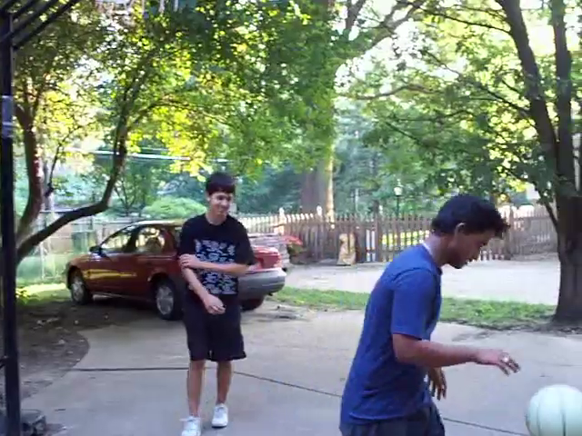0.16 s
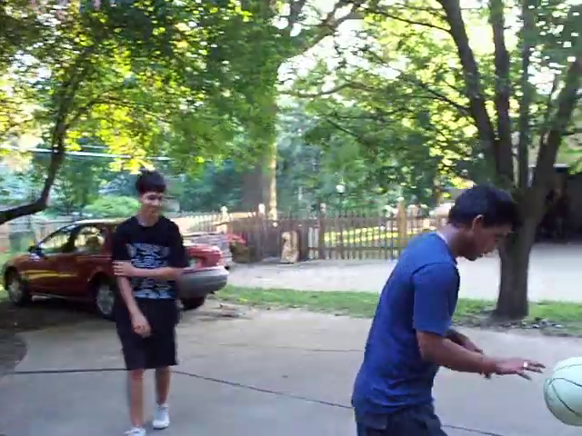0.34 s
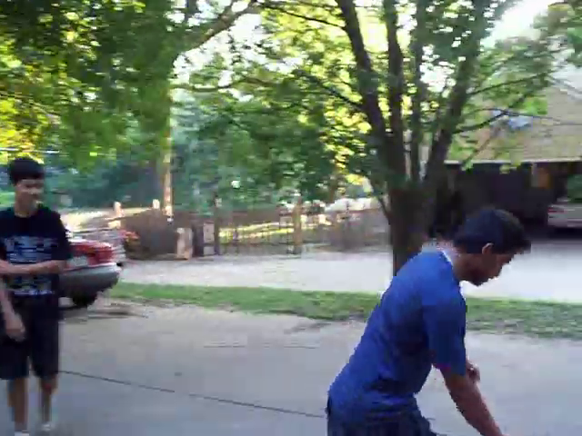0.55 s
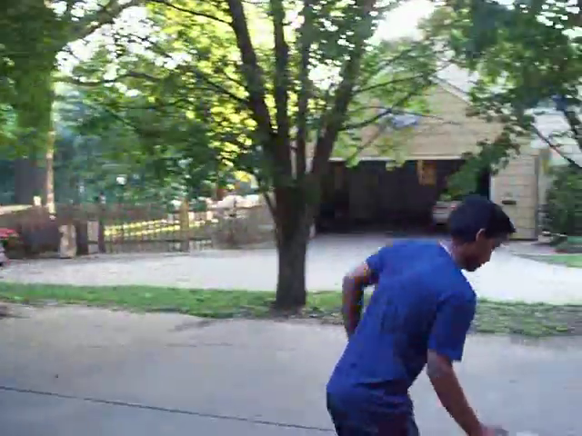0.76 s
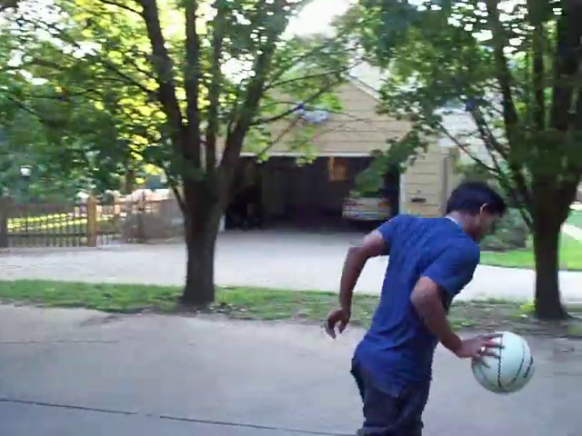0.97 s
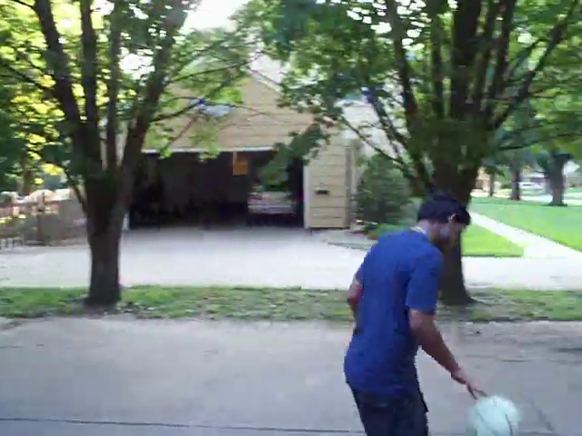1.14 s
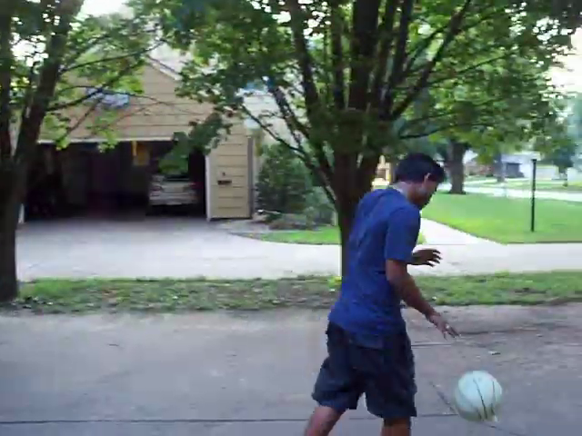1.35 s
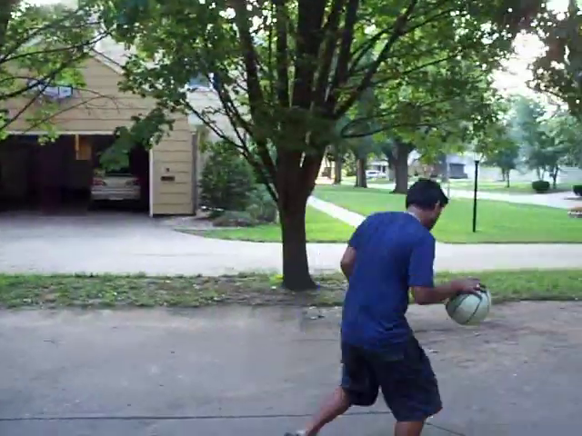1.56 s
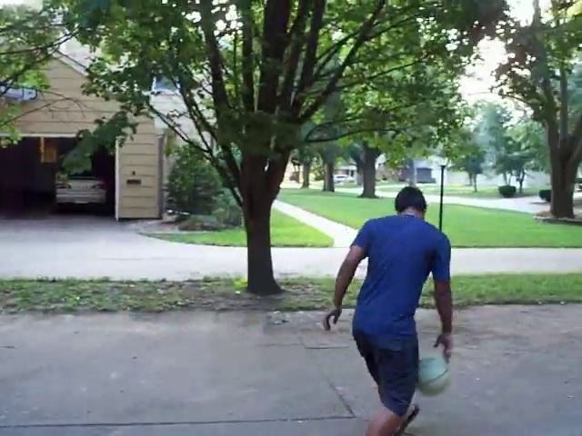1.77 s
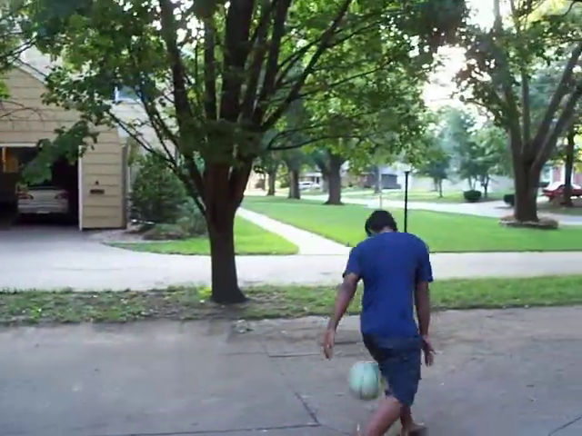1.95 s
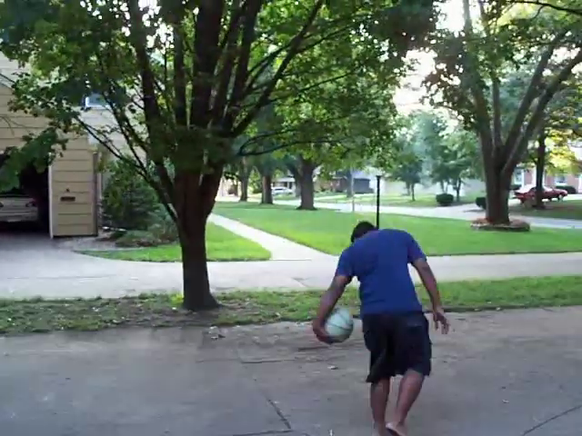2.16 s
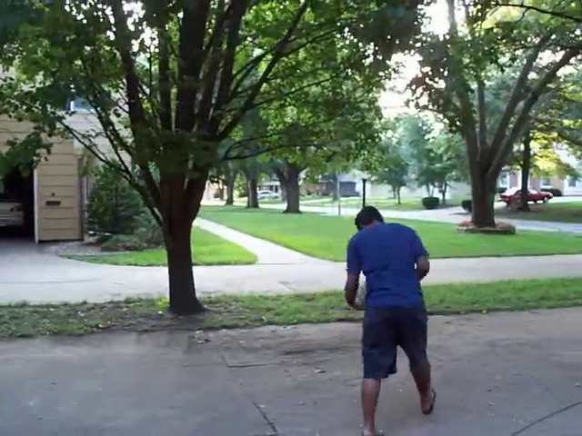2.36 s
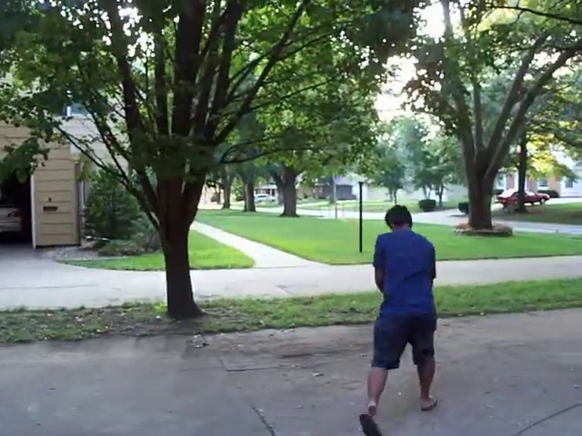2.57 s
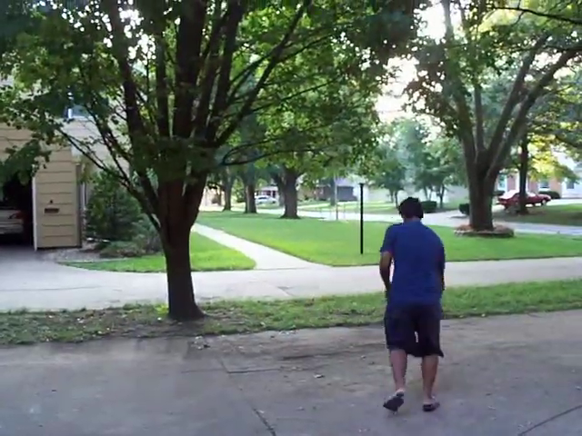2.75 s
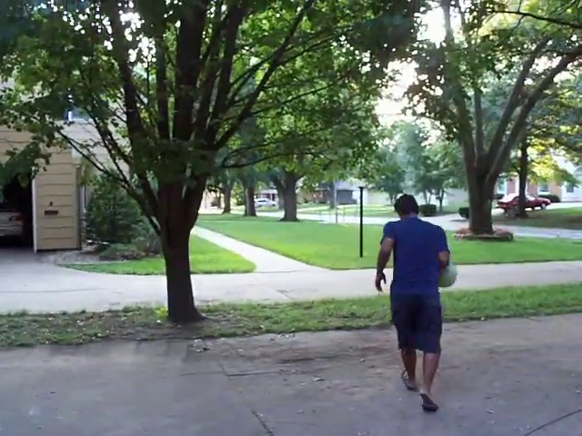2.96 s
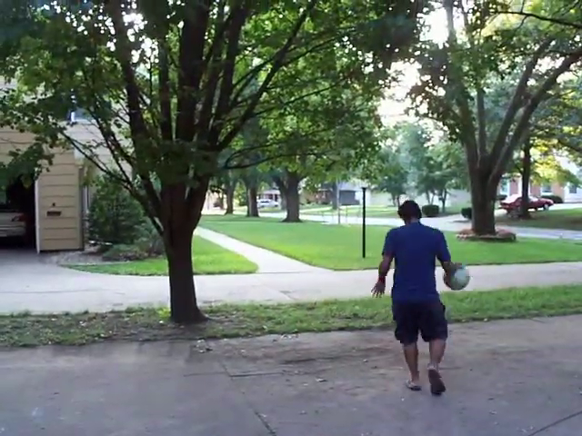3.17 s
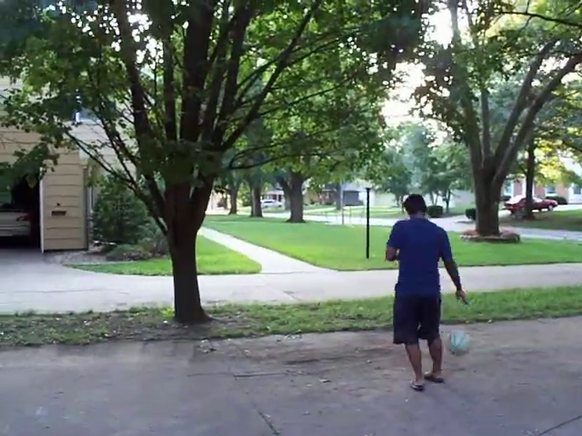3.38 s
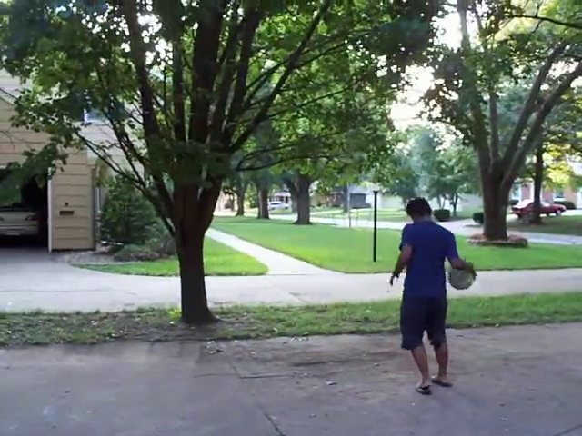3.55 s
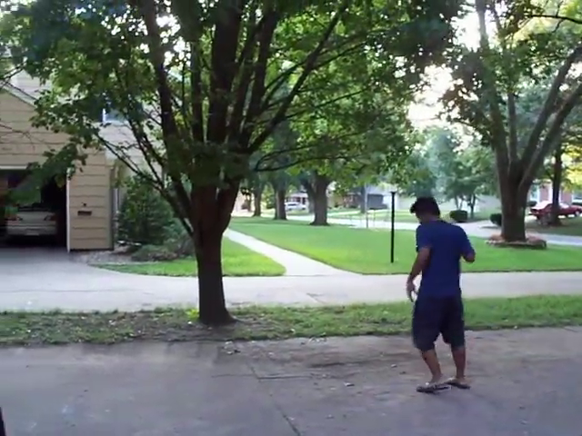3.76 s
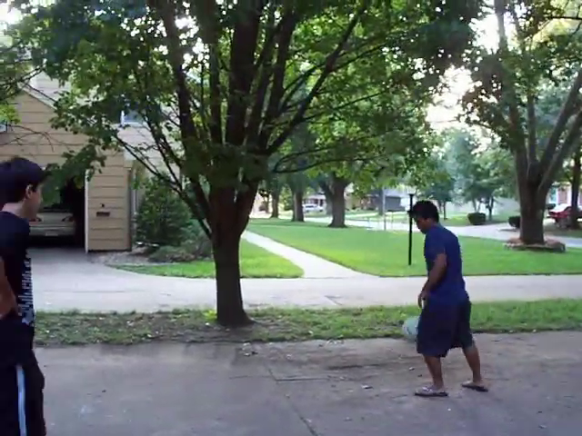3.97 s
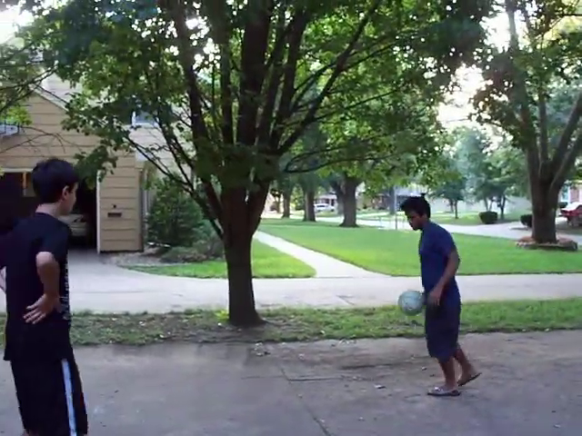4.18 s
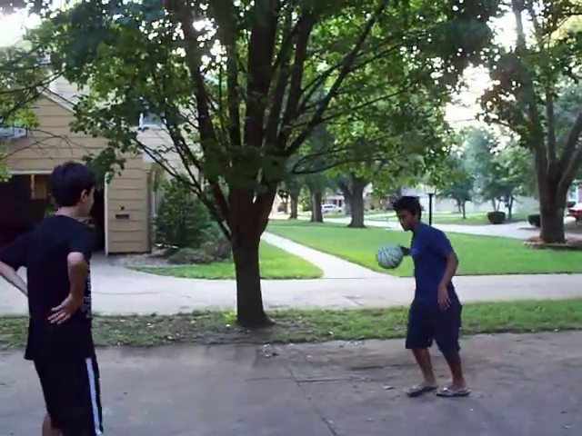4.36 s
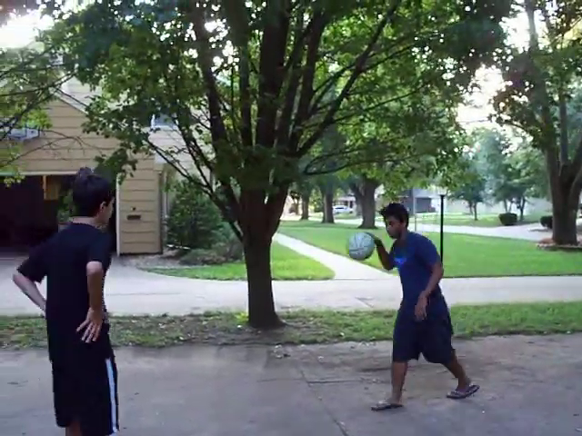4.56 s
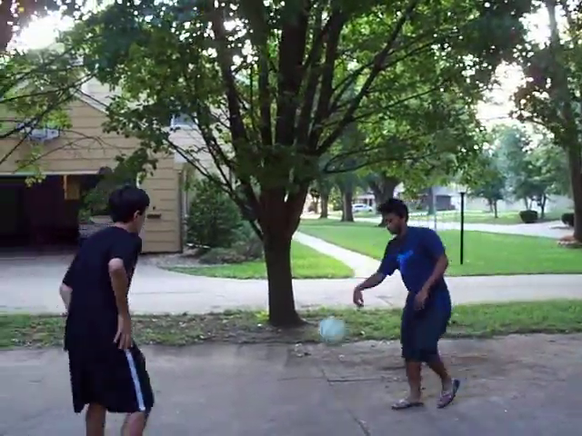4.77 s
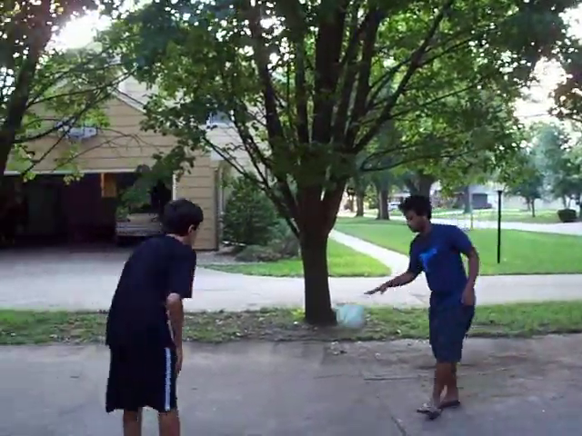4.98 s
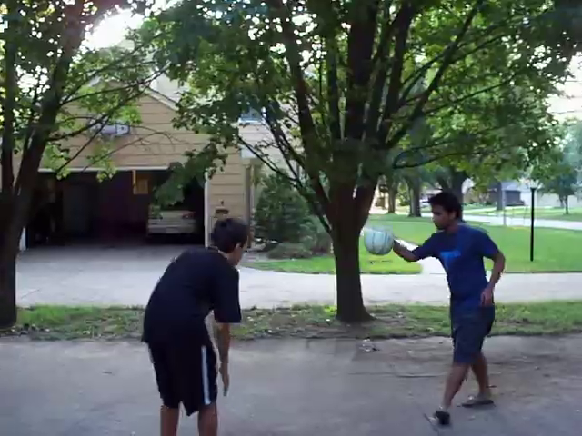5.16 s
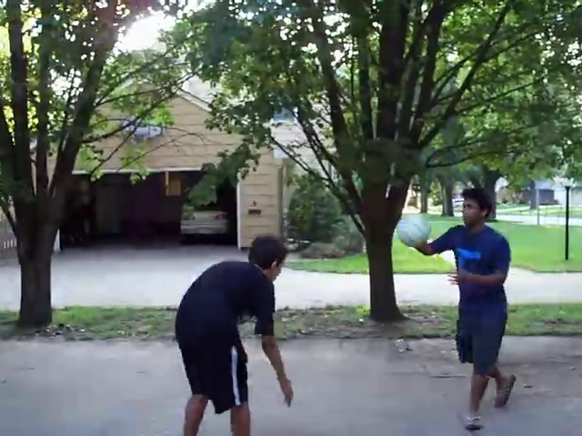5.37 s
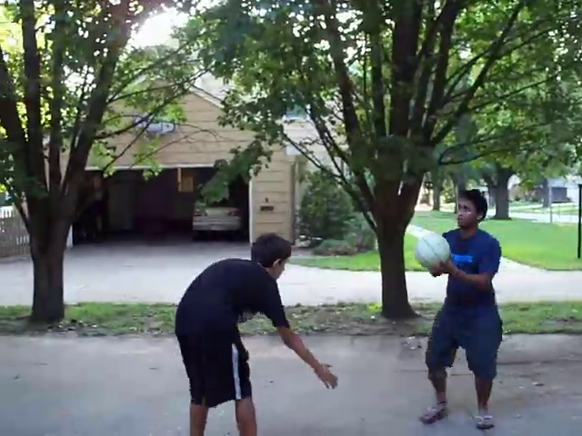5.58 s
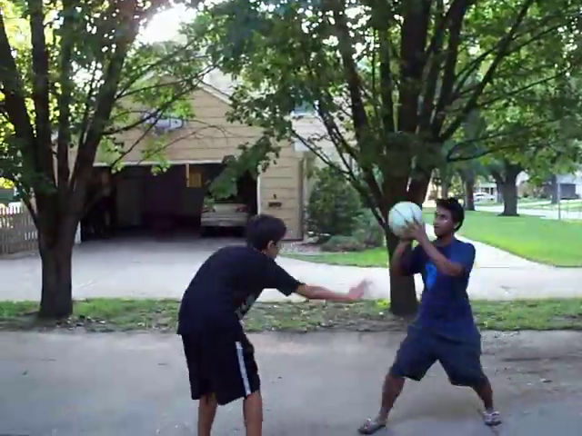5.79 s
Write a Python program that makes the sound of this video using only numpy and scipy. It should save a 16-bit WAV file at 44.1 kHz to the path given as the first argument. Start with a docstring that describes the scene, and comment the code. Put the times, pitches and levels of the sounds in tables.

```python
"""A basketball is dribbled on a concrete driveway; distant traffic, hiss and an echo are there at once.
A faint far whistle passes, then from 0.6 s come seven bounces: each a low thump, a rubber slap and a
faint ring of the air inside, thrown back by house fronts and trees. In between, hands pat the ball and
sandals flap and scuff on grit, a little more echoing from 1 to 3 s as the player walks off.
Thin whistles return after 4 s; the last bounce lands at 4.9 s, and a few steps close the scene."""
import sys
import numpy as np
from scipy import signal
from scipy.fft import rfft, irfft, next_fast_len
from scipy.io import wavfile

SR = 44100
rng = np.random.default_rng(int(sys.argv[2]) if len(sys.argv) > 2 else 0)


def log_audio(samples):
    """Write samples as a 16-bit WAV file to the path given in sys.argv[1]."""
    # one column per channel
    frames = np.atleast_2d(samples).T
    # limit to full scale, then quantise
    limited = np.clip(frames, -1, 1)
    pcm = np.round(limited * 32767).astype(np.int16)
    wavfile.write(sys.argv[1], SR, pcm)


N = 256662
T = np.arange(N) / SR


# the ball hitting concrete: t/s, slap level/dB, thump level/dB, thump f/Hz, slap treble/dB
BOUNCE_HITS = [(0.62, -3, -10.5, 141.5, -3.5), (1.233, -2.5, -12.5, 147, -1),
               (1.856, -7.5, -12.5, 155, 5.5), (2.6904, -9.5, -10.5, 158, -2.5),
               (3.3369, -6.5, -13, 136.5, 5.5), (4.0442, -8.5, -12.5, 140, 2),
               (4.8628, -4, -10.5, 135.6, -1.5)]

def dribble(tail_skip_s=0.07, tail_db=-3):
    """The run of bounces, opening on the echo tail of one that fell just before."""
    out = np.zeros(N)
    for s, *hit in BOUNCE_HITS:
        for layer in bounce(*hit):
            add(out, s, layer)
    _, tail = bounce(*BOUNCE_HITS[0][1:])
    add(out, 0, undb(tail_db) * tail[int(tail_skip_s * SR):])
    return out


def bounce(slap_db, thump_db, hz, treble_db, thump_send_db=2, ring_send_db=-8):
    """One hit in three layers, as (direct, echo); the player moves, so each gets its own echo."""
    direct, reverb = np.zeros(N), yard()
    squash_s = 0.0046 * undb(slap_db) ** 0.44  # a harder hit flattens the ball for longer
    body = undb(thump_db + 5) * thump(hz, squash_s)
    ring = undb(slap_db - 15) * ball_ring()
    attack = undb(slap_db) * rubber_eq(slap(), treble_db)
    for layer in body, ring, attack:
        add(direct, 0, layer)
    # the yard gathers the slap from all directions, which evens out its tone and strength
    echo = undb(18 + 0.49 * slap_db) * rubber_eq(reverb, treble_db / 2)
    for layer, send_db in (body, thump_send_db), (ring, ring_send_db):
        echo += undb(send_db) * signal.fftconvolve(layer, reverb)[:len(reverb)]
    return direct, echo


def thump(hz, squash_s, overtone=1.695, overtone_db=-15):
    """The low body: the ball flattens and springs back in a few swings, with a weaker, higher flex."""
    t = T[:SR // 10]
    swing = np.sin(2 * np.pi * hz * t) - undb(overtone_db) * np.sin(2 * np.pi * overtone * hz * t)
    envelope = (t / squash_s * np.exp(1 - t / squash_s)) ** 1.5
    return envelope * swing


def slap(spike_db=14, crack_db=-4, liftoff_s=0.0073, pop_db=-8):
    """The attack: a spike on contact, a crack as the skin flattens, a duller pop on lift-off."""
    t = T[:SR // 10]
    crack = undb(crack_db) * rng.standard_normal(len(t)) * fade(t, t60=0.026)
    crack[0] += undb(spike_db)
    pop = resonate(rng.standard_normal(len(t)), 900, 1100)
    return crack + undb(pop_db) * pop * fade(np.abs(t - liftoff_s), t60=0.037)


# EQ curve of rubber slapping concrete: f/Hz, level/dB
RUBBER_CURVE = [(100, -5.5), (350, 2.5), (600, 2), (1200, 0.5), (2400, -2), (3900, 0), (5200, -4),
                (7000, -14.5)]

def rubber_eq(x, treble_db):
    """The tone of rubber on concrete; a harder spot is brighter."""
    presence = (undb(treble_db) - 1) * resonate(x, 4450, 6400)
    return colour(x + presence, RUBBER_CURVE)


# modes of the ball's shell and the air inside: f/Hz, level/dB, t60/s
BALL_MODES = [(612, -12, 0.095), (960, -34.5, 0.11), (1098, -1.5, 0.051), (1250, -29, 0.063),
              (1511, -2, 0.031), (1706, -3, 0.022), (1896, -19, 0.19), (3059, -29, .16),
              (3926, -25.5, 0.09), (4650, -40, 0.044)]

def ball_ring(spread_db=2):
    """The ball lands on a new spot each time, so its modes share the blow differently."""
    out, t = np.zeros(SR), T[:SR]
    for hz, db, t60 in BALL_MODES:
        gain = undb(db + spread_db * rng.standard_normal())
        out += gain * fade(t, t60) * np.sin(2 * np.pi * hz * t + rng.uniform(0, np.pi))
    return out


# palms meeting the ball: t/s, level/dB, cupped-hand f/Hz, t60/s, treble/dB
HAND_PATS = [(0.165, -34, 1090, 0.085, 9), (1.021, -5, 765, 0.014, -4.5), (1.8029, -18.5, 979, 0.01, 2),
             (1.919, -12, 690, 0.016, 6), (2.524, -21, 1170, 0.013, -2), (2.611, -23.5, 850, 0.056, 4),
             (3.0076, -19, 517, 0.038, 4.5), (3.845, -33, 630, 0.082, 10), (4.536, -22, 540, 0.021, 8.5)]

def hands(attack_s=0.00036, overtone=1.465, palm_hz=547, thud_db_per_octave=-34.5):
    """The palm traps a pocket of air that rings at two pitches, the skin smacks and the ball thuds."""
    out, t = np.zeros(N), T[:SR // 5]
    for s, db, hz, t60, treble_db in HAND_PATS:
        cup_noise, skin_noise = rng.standard_normal((2, len(t)))
        cup = unit(resonate(resonate(cup_noise, hz, 0.97 * hz), hz, 2 * hz))
        pocket = np.sin(2 * np.pi * hz * t) - undb(-3) * np.sin(2 * np.pi * overtone * hz * t)
        skin = unit(resonate(resonate(skin_noise, 3600, 3300), 2200, 4900))
        pat = undb(-8) * cup + undb(-9) * pocket + undb(treble_db - 10) * skin
        envelope = np.minimum(t / attack_s, 1) * fade(t, t60)
        add(out, s, undb(db) * envelope * pat)
        # a full palm sounds low and shakes the ball; fingertips sound high and hardly do
        thud_db = -4.5 + thud_db_per_octave * np.log2(hz / palm_hz)
        add(out, s, undb(db + thud_db) * thump(hz=175, squash_s=0.002))
    return out


# sandals flapping on heels and concrete: t/s, level/dB
SANDAL_FLAPS = [(0.236, -31), (0.8794, -44), (1.4712, -29), (2.8622, -19), (3.704, -36), (4.4582, -29),
                (5.225, -30), (5.2562, -31), (5.3875, -25), (5.395, -30.5), (5.7584, -40), (5.79, -34)]

def sandals(trim_db=-3):
    """Short, bright flaps of rubber."""
    out = np.zeros(N)
    for s, db in SANDAL_FLAPS:
        add(out, s, undb(db + trim_db) * sole_snap(hz=3260, t60=0.02))
    return out


# soles dragging over grit and, at 1.003 s, a hand brushing the ball just before the pat:
# t/s, length/s, level/dB, centre f/Hz
FRICTION_STROKES = [(0.45, 0.11, -52, 1600), (0.777, 0.22, -42, 2470), (1.003, 0.023, -34, 1150),
                    (1.419, 0.092, -42, 1920), (2.074, 0.014, -31.5, 2150), (2.621, 0.12, -37.5, 3000),
                    (2.835, 0.31, -44, 2700), (3.638, 0.11, -46, 2900), (3.86, 0.064, -40.5, 1750),
                    (4.441, 0.11, -35, 1810), (4.544, 0.077, -43.5, 3000), (4.848, 0.082, -29.5, 2900),
                    (5.751, 0.031, -35, 2050), (5.78, 0.072, -31, 1590)]

def friction(trim_db=-1):
    """One surface slides over another and catches, giving a grainy band of noise."""
    out = np.zeros(N)
    for s, length, db, hz in FRICTION_STROKES:
        catches = undb(3.5 * flicker(SR, 220))
        drag = unit(resonate(grit(SR, spread_db=9.5) * catches, hz, 1.23 * hz))
        pressure = np.sin(np.pi * np.minimum(T[:SR] / length, 1)) ** 0.47  # bites early, lets go late
        add(out, s, undb(db + trim_db) * drag * pressure)
    return out


def sole_snap(hz, t60):
    """A short, grainy burst of rubber on grit."""
    t = T[:SR // 5]
    crunch = resonate(grit(len(t), spread_db=4), hz, hz)
    return unit(resonate(crunch, hz, 2 * hz)) * fade(t, t60)


# dull, hollow steps: t/s, level/dB, f/Hz
HOLLOW_STEPS = [(0.178, -33.5, 707), (5.466, -28.5, 485)]

def footfalls(trim_db=-7, rise_s=0.0047, overtone=2.64, overtone_db=-4):
    """A flat sole lands softly and squeezes out the air beneath it: two broad resonances."""
    out, t = np.zeros(N), T[:SR // 5]
    envelope = t / rise_s * np.exp(1 - t / rise_s)
    for s, db, hz in HOLLOW_STEPS:
        air = rng.standard_normal(len(t))
        low, high = (band(air, f, 0.6 * f) for f in (hz, overtone * hz))
        add(out, s, undb(db + trim_db) * (low + undb(overtone_db) * high) * envelope)
    return out


def grain_ticks(per_s=2.7, level_db=-43.5, spread_db=2, centre_hz=2620):
    """Loose grains crack underfoot now and then."""
    out = np.zeros(N)
    for k, (jitter, size, pitch) in enumerate(rng.standard_normal((60, 3))):
        s = (k + jitter / 2) / per_s
        hz = centre_hz * 2 ** (np.tanh(pitch) / 2)
        add(out, s, undb(level_db + spread_db * size) * sole_snap(hz, t60=0.019))
    return out


# slapback off nearby walls: delay t/s, level/dB
WALL_TAPS = [(0.0182, -8), (0.023, -22.5), (.034, -42), (0.043, -17), (0.067, -28), (0.08, -17)]
# tone of the scatter off house fronts and trees: f/Hz, early level/dB, late level/dB
SCATTER_CURVES = [(35, -3, -16), (55.7, -1, -16), (76.5, -3, -13), (99, -13.5, -17.5), (173, -22, -16),
                  (270, -10.5, -14), (610, -10, -12.5), (1080, -8.5, -13), (2600, -9.5, -9.5),
                  (4300, -12, -13.5), (7000, -11.5, -11)]

def yard(predelay_s=0.0098, build_s=0.0026, early_t60=0.35, late_t60=0.73, delay_spread=0.05):
    """The yard's impulse response: a few walls, dense scatter, then a thin tail from far houses."""
    taps, t = np.zeros(N), T[:3 * SR // 2]
    for s, db in WALL_TAPS:
        add(taps, s * (1 + delay_spread * rng.standard_normal()), undb([db]))
    reverb = colour(taps[:len(t)], [(200, -11.5), (1200, -19), (5000, -13)])
    hz, early_db, late_db = np.transpose(SCATTER_CURVES)
    onset = np.clip((t - predelay_s) / build_s, 0, 1)
    for db, t60 in (early_db, early_t60), (late_db, late_t60):
        scatter = grit(len(t), spread_db=5) * onset * fade(t, t60)
        reverb += colour(unit(scatter) / np.sqrt(len(t)), np.c_[hz, db])
    return reverb


# faint far whistles, like small birds: t/s, length/s, start f/Hz, end f/Hz, level/dB
FAR_WHISTLES = [(0.214, 0.36, 3500, 3210, -60.5), (4.197, 0.25, 2910, 2920, -61),
                (4.22, 0.38, 4540, 4600, -66), (5.111, 0.15, 2900, 2930, -52),
                (5.265, 0.11, 2960, 3060, -63)]

def whistles(waver=0.0045, flutter_db=3.5):
    """Thin glides, unsteady in pitch and level after their way through the trees."""
    out = np.zeros(N)
    for s, length, start_hz, end_hz, db in FAR_WHISTLES:
        progress = np.minimum(T[:SR] / length, 1)
        hz = (start_hz + (end_hz - start_hz) * progress) * (1 + waver * flicker(SR, 340))
        envelope = undb(flutter_db * flicker(SR, 60)) * np.sin(np.pi * progress)
        add(out, s, undb(db) * envelope * np.sin(2 * np.pi * np.cumsum(hz) / SR))
    return out


# EQ curve of the bed of distant traffic and hiss: f/Hz, relative level/dB
BED_CURVE = [(15, -3), (25, 10), (282, -1), (366, -1), (575, -7), (783, -9.5), (1140, -11.5), (1760, -14.5),
             (2280, -20), (2820, -17.5), (3330, -16.5), (4990, -18.5), (5620, -8.5), (6330, -16.5),
             (7300, -14), (9490, 0), (16100, -120)]
# a low rumble and two bands of hiss: f/Hz, width/Hz, level/dB
BED_BANDS = [(67.6, 81, -58), (5800, 790, -62.5), (6690, 240, -66.5)]

def traffic_and_hiss(bed_db=-49, drift_db=0.5):
    """Distant traffic that swells a little, under a steady high hiss."""
    bed = unit(colour(rng.standard_normal(N), BED_CURVE))
    gain = undb(bed_db + drift_db * flicker(N, 3.51))
    bands = sum(undb(db) * band(rng.standard_normal(N), hz, width) for hz, width, db in BED_BANDS)
    return gain * bed + bands


def undb(db):
    """Decibels to gain."""
    return 10 ** (np.asarray(db) / 20)


def unit(x):
    """Scale to rms 1."""
    return x / np.sqrt(np.mean(x ** 2))


def fade(t, t60):
    """Exponential decay, 60 dB down after t60 seconds."""
    return np.exp(-np.log(1000) * t / max(t60, 1e-3))


def add(track, s, x):
    """Mix x into the track at s seconds."""
    i = max(int(s * SR), 0)
    track[i:i + len(x)] += x[:max(N - i, 0)]


def colour(x, points):
    """Minimum-phase EQ through points of f/Hz, level/dB."""
    hz, db = np.transpose(points)
    half = next_fast_len(len(x))
    bins_hz = np.arange(half + 1) * SR / (2 * half)
    curve_db = np.interp(np.log(bins_hz + 1), np.log(hz), db)
    cepstrum = irfft(np.log(undb(curve_db)))
    cepstrum[1:half] *= 2
    cepstrum[half + 1:] = 0
    return irfft(rfft(x, 2 * half) * np.exp(rfft(cepstrum)))[:len(x)]


def resonate(x, hz, width_hz):
    """One broad resonance, gain 1 at its centre."""
    return signal.lfilter(*signal.iirpeak(hz, hz / min(width_hz, SR / 3), fs=SR), x)


def band(x, hz, width_hz):
    """The same resonance twice for steeper skirts, scaled to rms 1."""
    return unit(resonate(resonate(x, hz, width_hz), hz, width_hz))


def grit(count, spread_db):
    """Noise made of grains of unequal size."""
    return unit(rng.standard_normal(count) * undb(spread_db * rng.standard_normal(count)))


def flicker(count, per_s):
    """Random modulation: values joined by straight lines, per_s of them a second."""
    knots = rng.standard_normal(count)
    return np.interp(np.arange(count) * per_s / SR, np.arange(count), knots)


# reverb send of hands and feet, rising as the player walks off down the drive: t/s, level/dB
FOLEY_SEND = [(1.0, -1.5), (3.0, 0.5)]

def scene():
    """Ball, hands and feet over the outdoor bed; hands and feet get wetter with distance."""
    ball = dribble()
    ambience = traffic_and_hiss() + whistles()
    foley = hands() + sandals() + friction() + footfalls() + grain_ticks()
    send = undb(np.interp(T, *np.transpose(FOLEY_SEND)))
    echo = signal.fftconvolve(send * foley, yard())[:N]
    return (ball + foley + echo + ambience)[None]


def record(dry, low_cut_hz=26, high_cut_hz=7200, ceiling=0.72, top_hz=16000):
    """The sound is dull above 7 kHz; the hardest slaps then clip into bright clicks."""
    low_cut = signal.sosfilt(signal.butter(2, low_cut_hz, "high", fs=SR, output="sos"), dry)
    narrow = signal.sosfilt(signal.cheby1(10, 0.3, high_cut_hz, fs=SR, output="sos"), low_cut)
    clipped = np.clip(narrow, -ceiling, ceiling)
    return signal.sosfilt(signal.ellip(8, 0.2, 70, top_hz, fs=SR, output="sos"), clipped)


dry = scene()
out = record(dry)
log_audio(out)
```